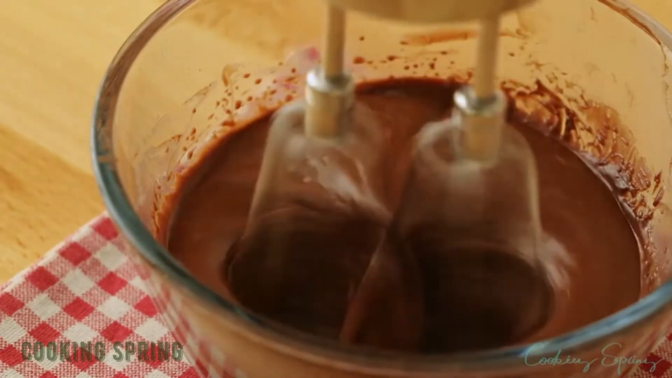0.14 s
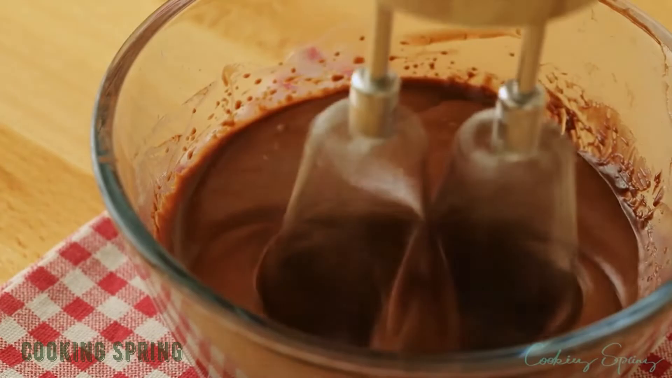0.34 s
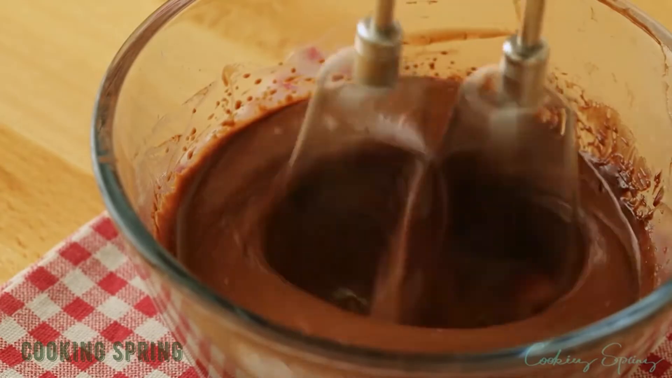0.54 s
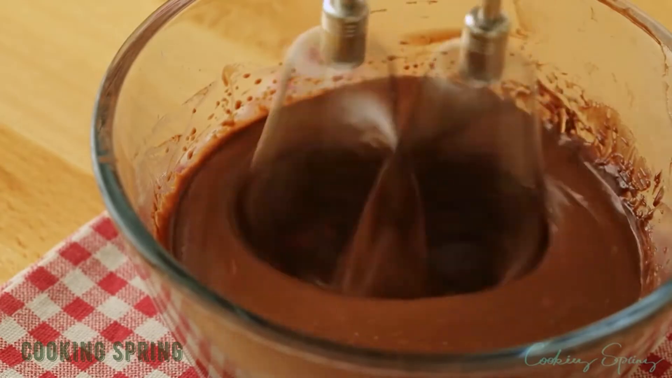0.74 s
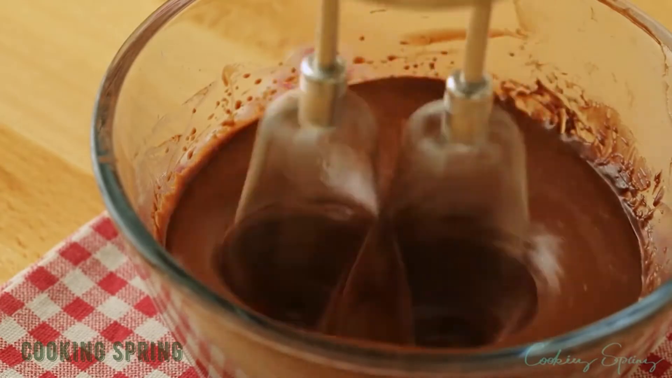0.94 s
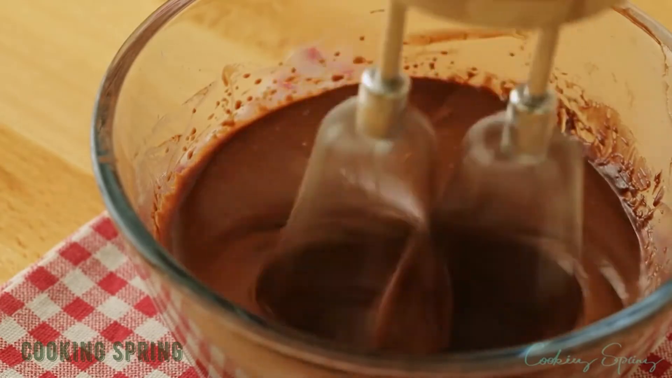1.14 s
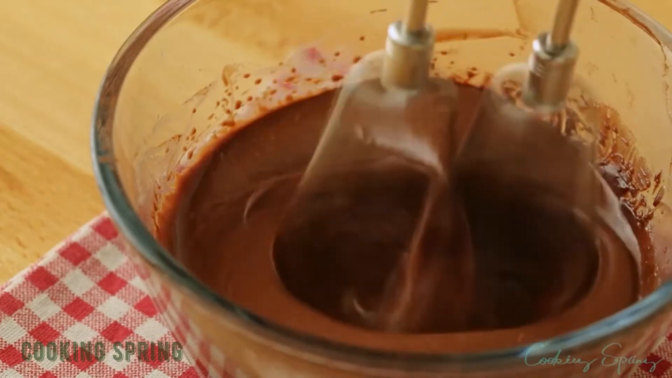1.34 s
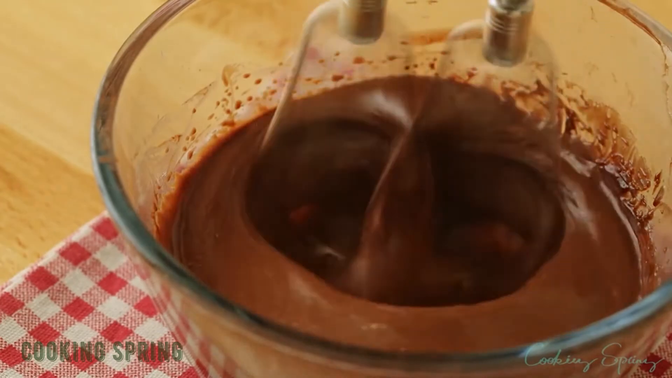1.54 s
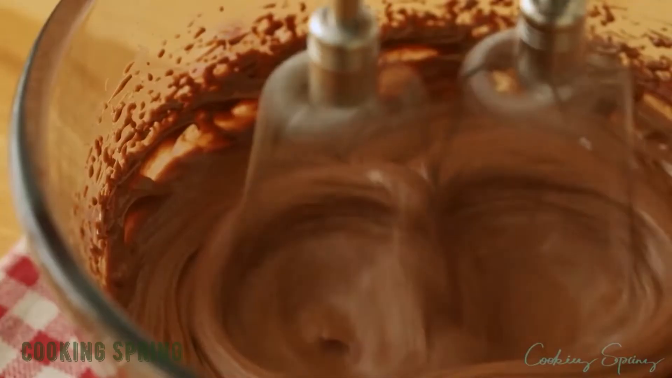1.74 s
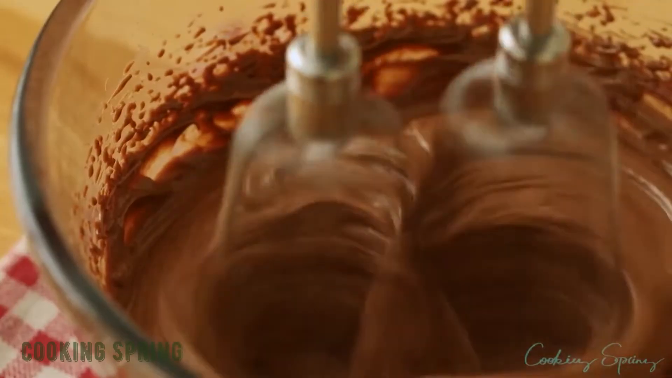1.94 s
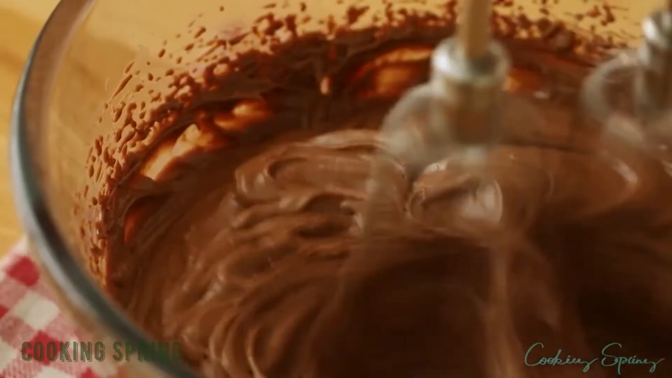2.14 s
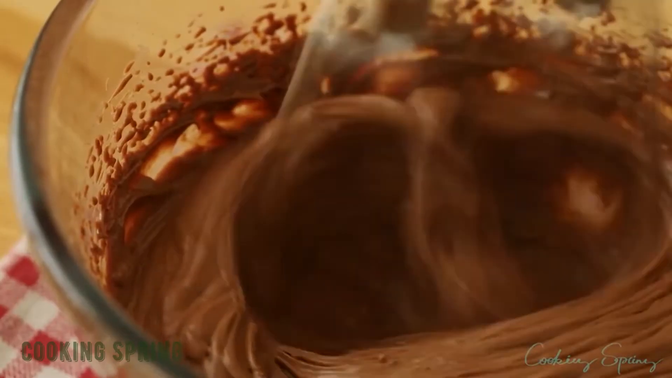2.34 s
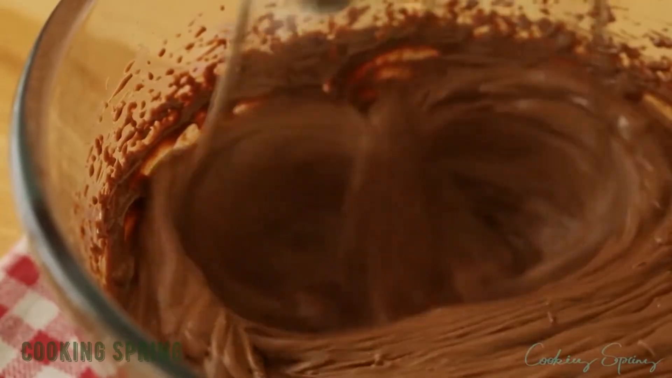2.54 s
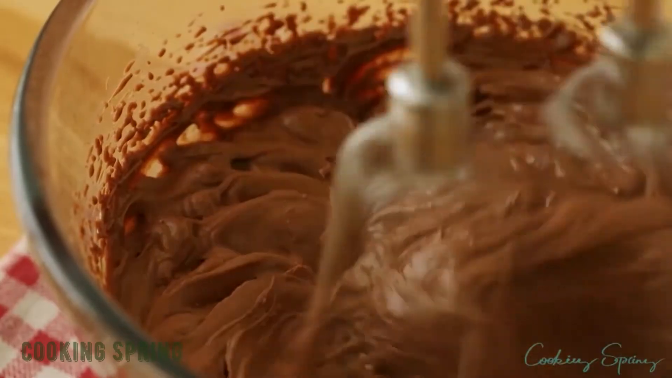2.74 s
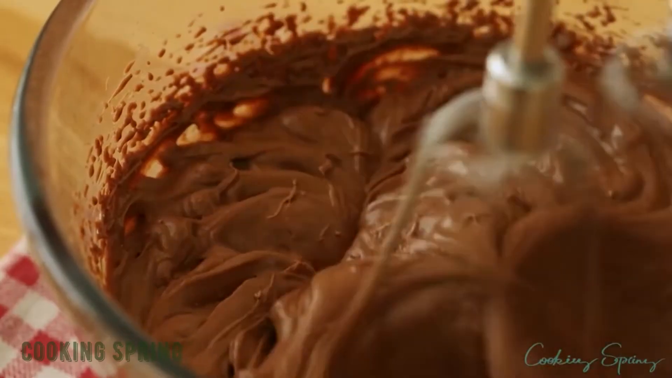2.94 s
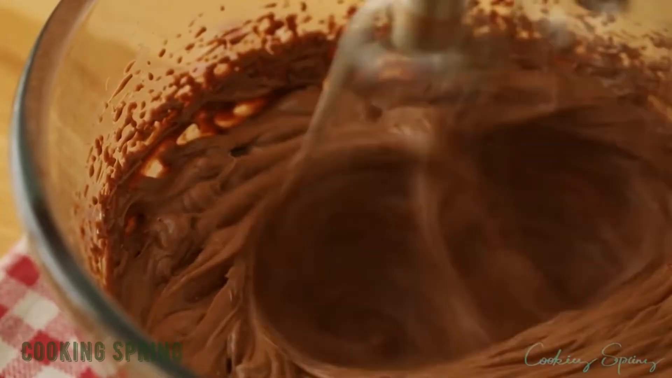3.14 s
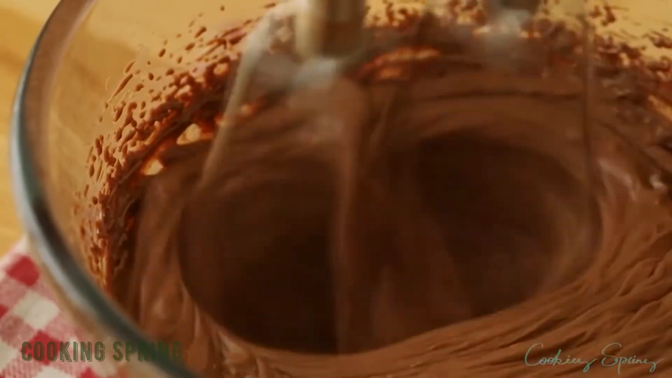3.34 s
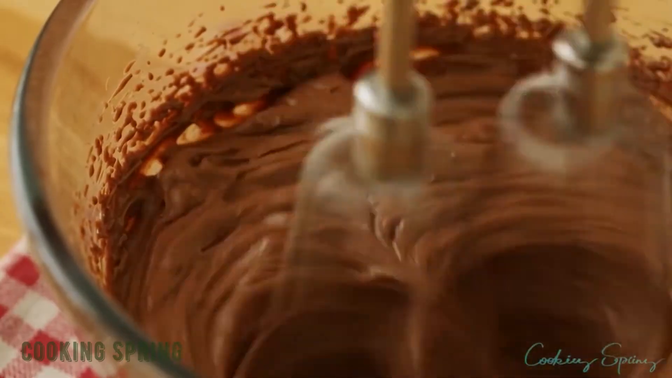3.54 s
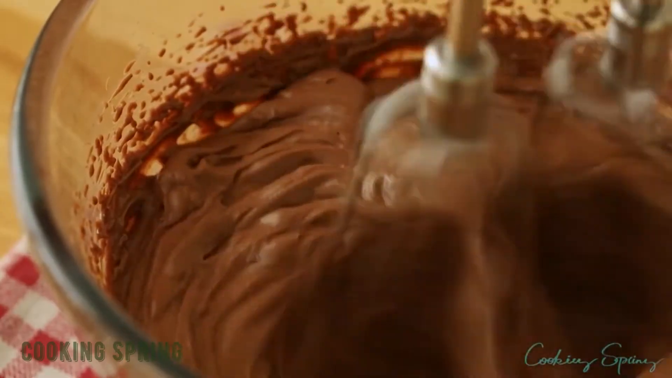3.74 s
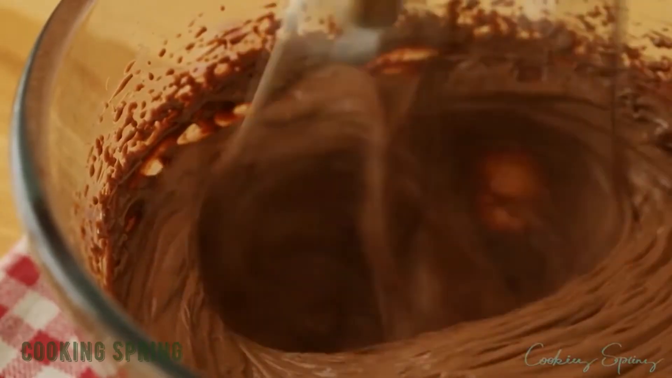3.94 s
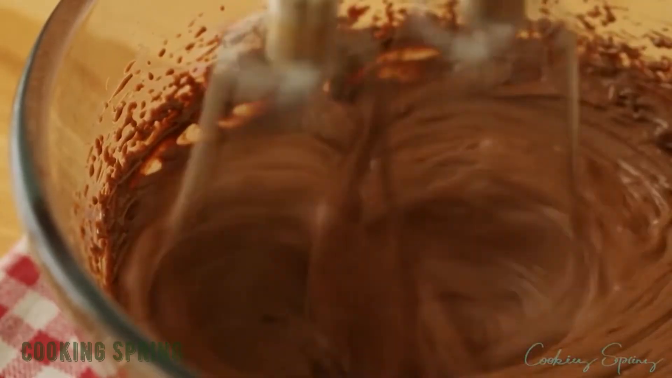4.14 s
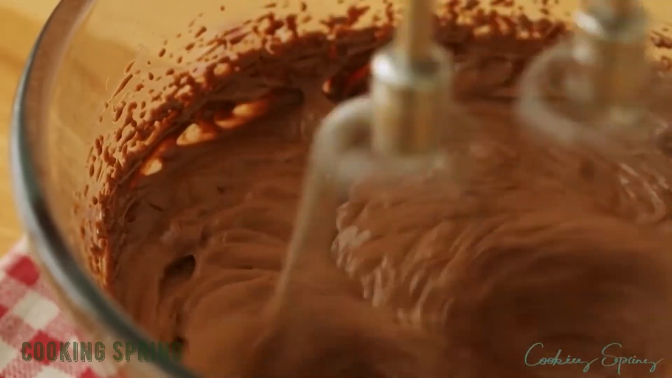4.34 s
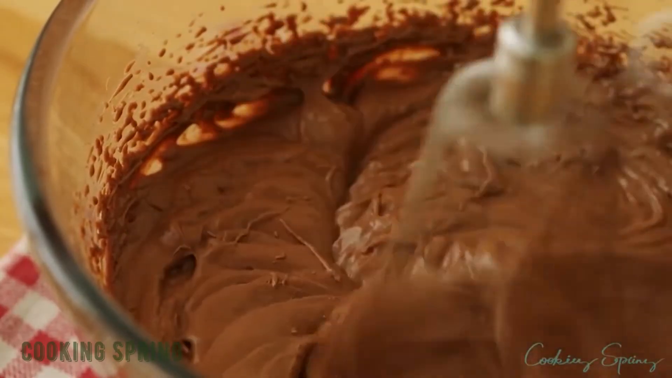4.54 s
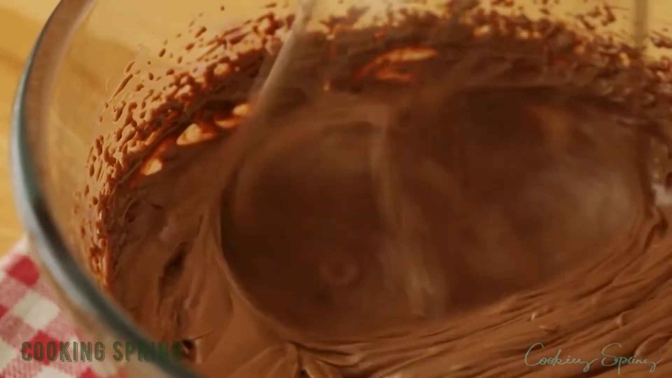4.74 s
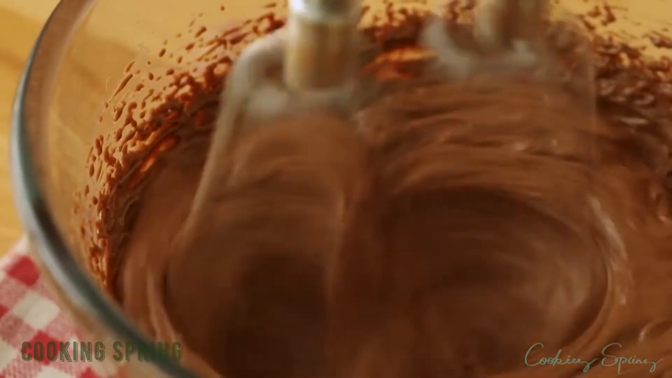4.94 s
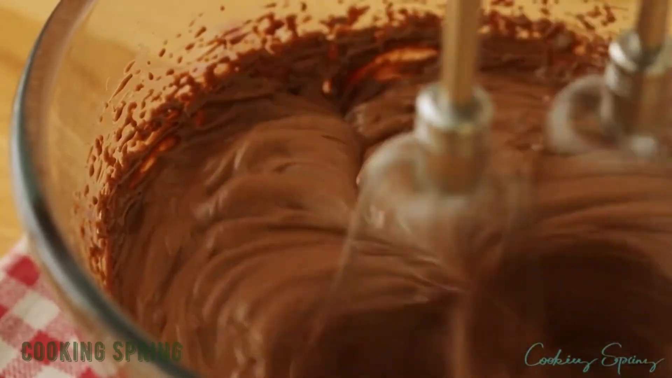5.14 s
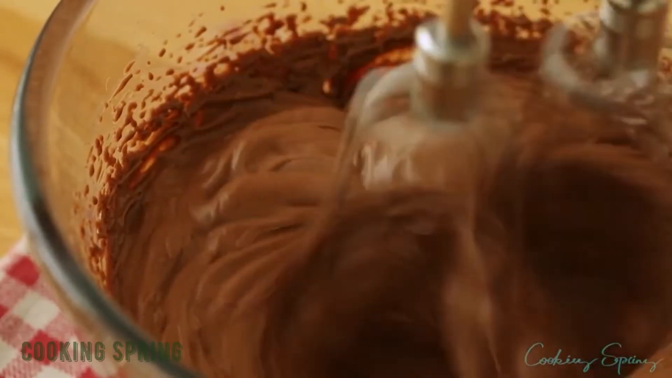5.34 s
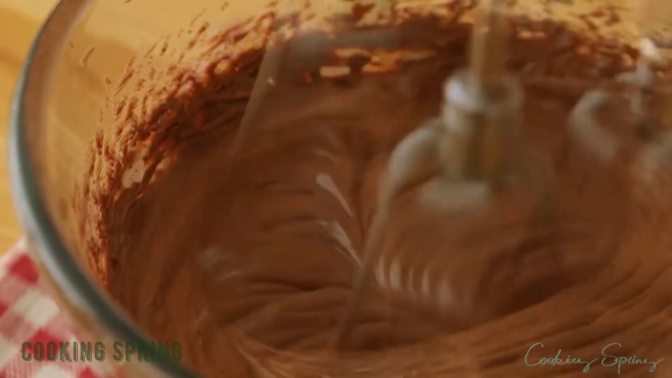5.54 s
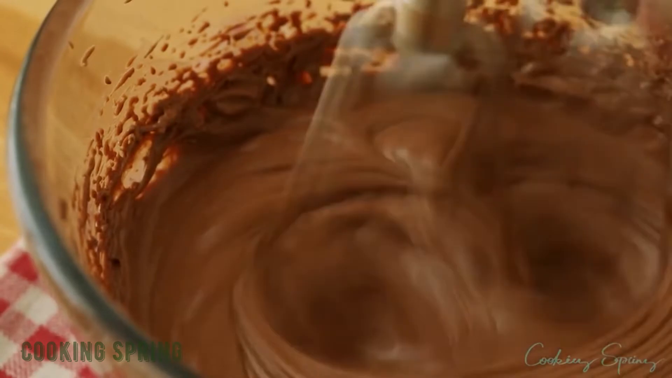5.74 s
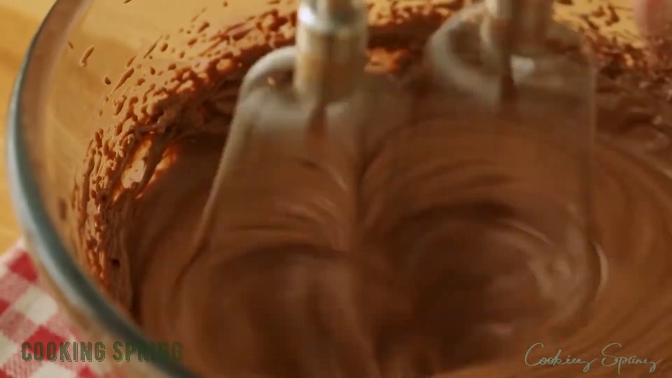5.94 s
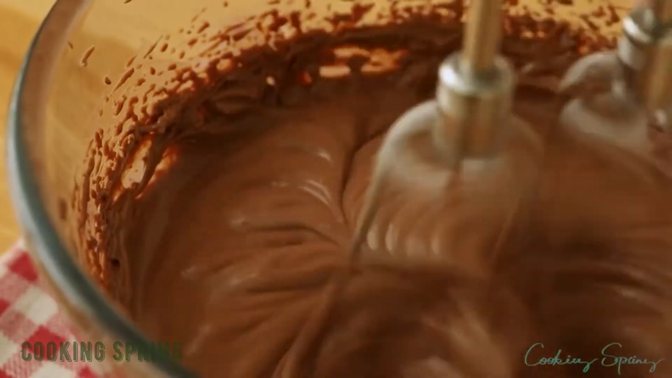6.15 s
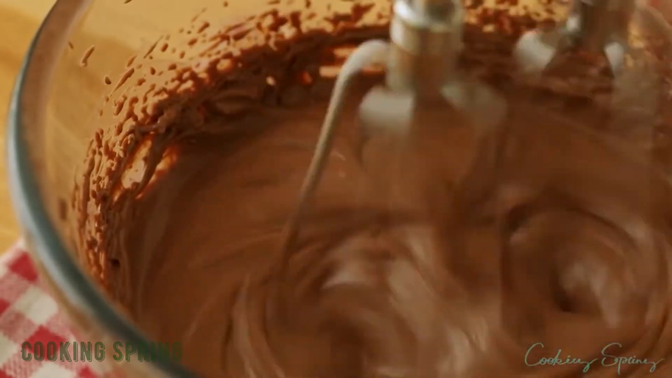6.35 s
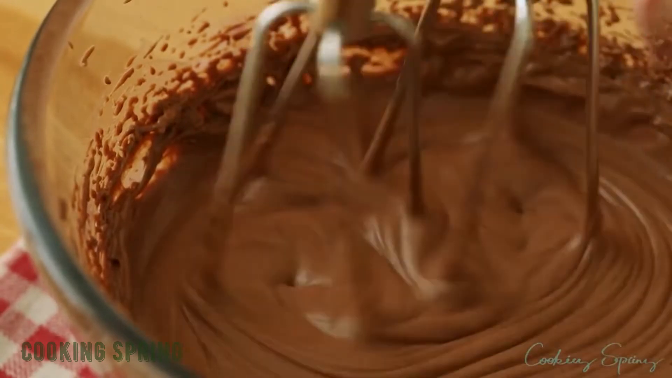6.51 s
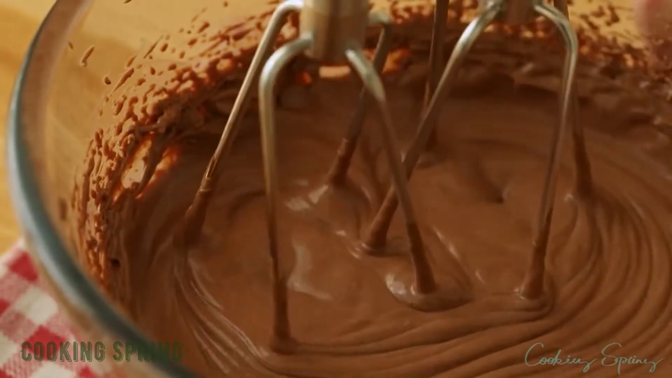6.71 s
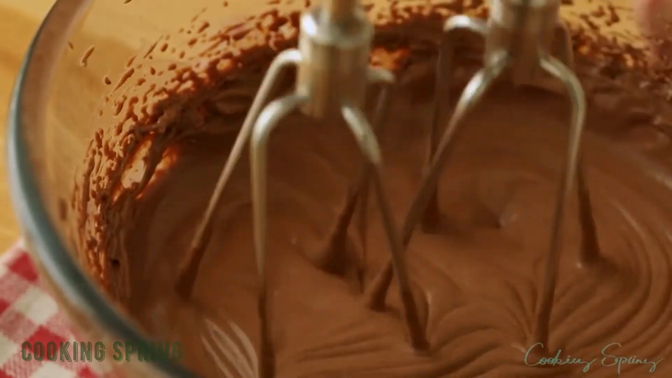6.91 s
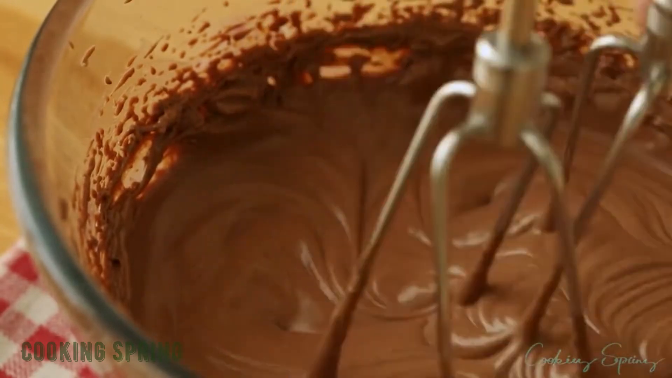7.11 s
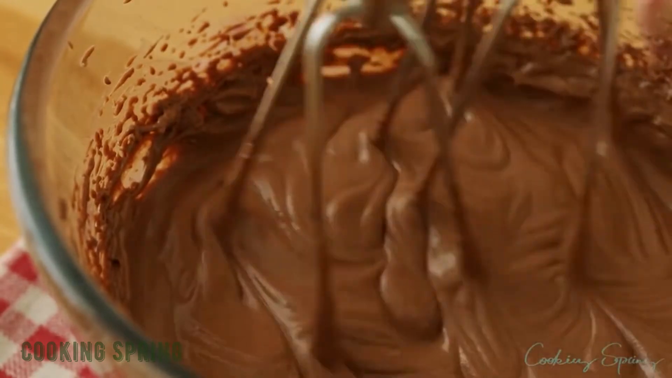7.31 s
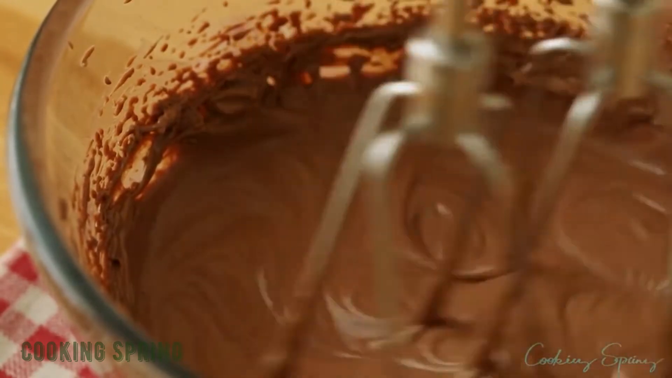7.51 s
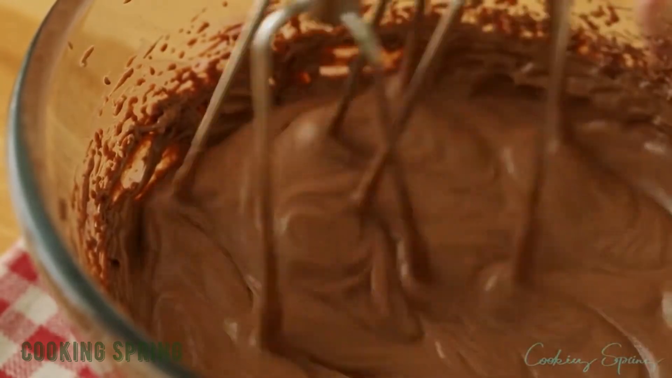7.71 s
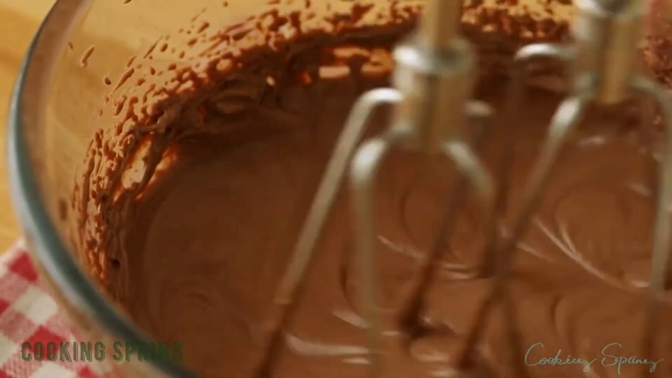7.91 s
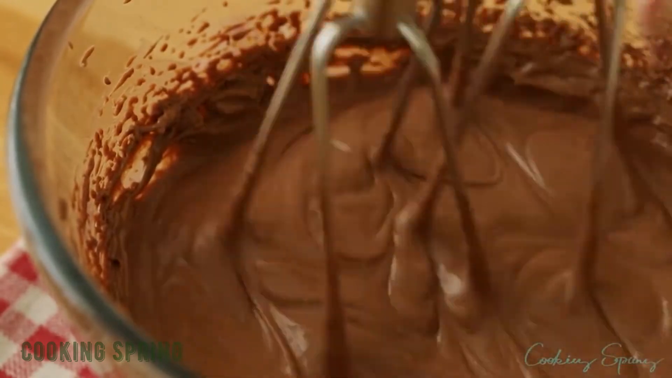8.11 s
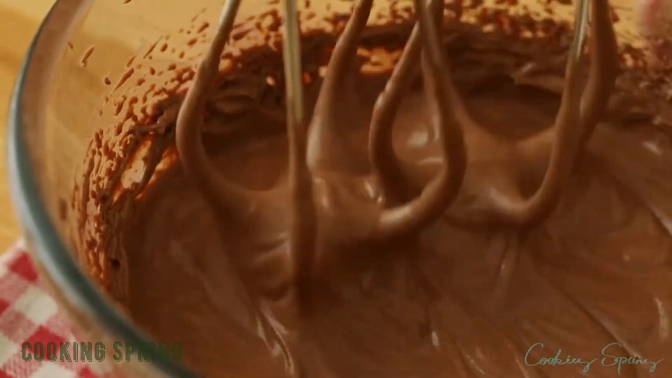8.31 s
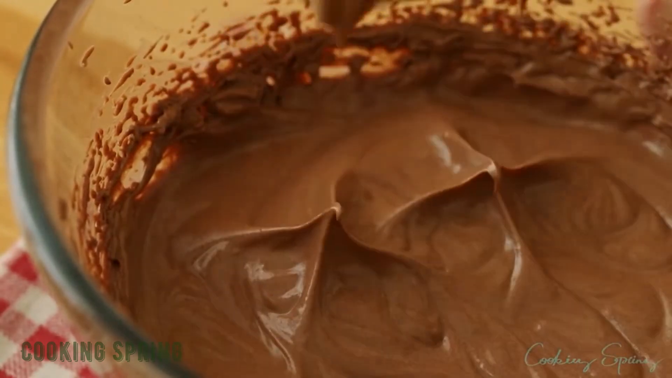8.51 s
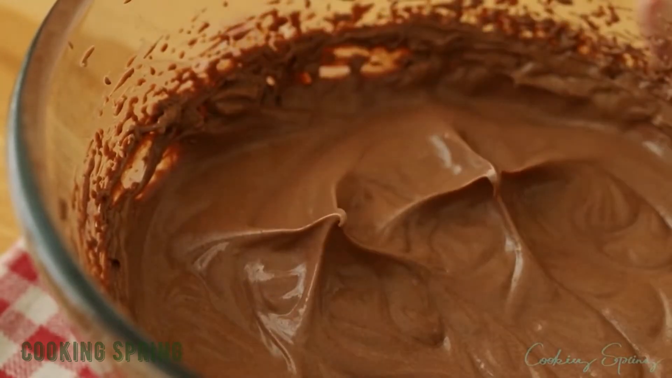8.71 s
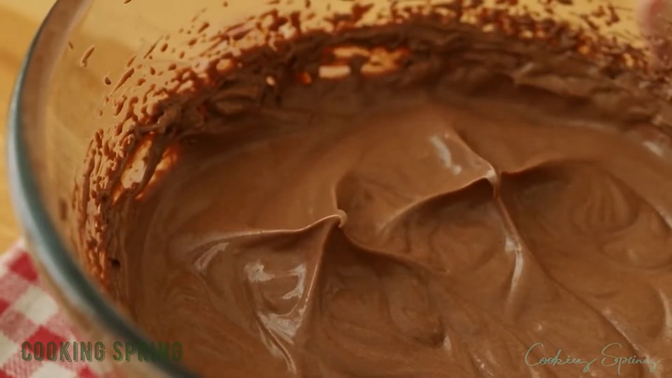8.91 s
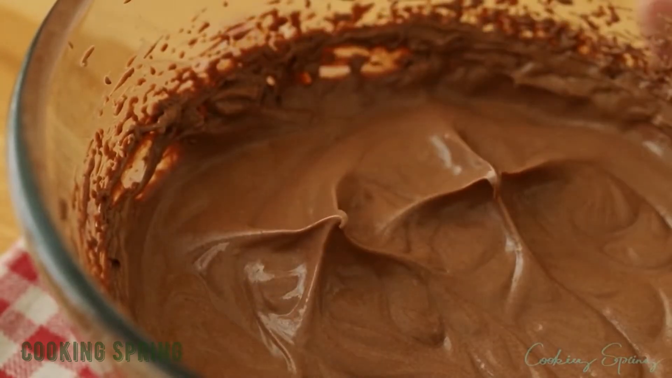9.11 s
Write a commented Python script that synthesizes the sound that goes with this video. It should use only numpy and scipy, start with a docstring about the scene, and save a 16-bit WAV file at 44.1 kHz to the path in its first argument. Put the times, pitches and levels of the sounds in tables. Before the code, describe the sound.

A kitchen hand mixer runs at the left, heard close and fairly dry: a nasal motor whine with gritty fan whir, wet slosh and quick glassy clinks. After a fast restart the batter sounds thicker and less splashy, the wires striking in short ringing runs. Then a slower, lower whirr knocks harder, coasts down to nothing, and isolated hollow clacks ring out before only faint appliance hiss remains.

```python
"""Hand mixer in batter

A hand mixer whips batter in a glass bowl, heard from the left. Its motor is a sum of shaft orders that
restarts once, runs slower and then winds down; fan whir, slosh and splash are shaped noise.
Beater wires ring the glass as damped modes with bursts of contact noise. After a short fade the still
beaters tap the bowl over a kitchen hiss of steady noise and a few fuzzy tones."""
import sys
import numpy as np
from scipy import signal
from scipy.io import wavfile
from scipy.ndimage import uniform_filter1d

SR = 44100
rng = np.random.default_rng(int(sys.argv[2]) if len(sys.argv) > 2 else 0)


def digitize_waveform(pressure):
    """Quantize a signal to 16-bit integers and store it at the path in sys.argv[1].

    Rows of a 2-D input are taken as channels; values are limited to [-1, 1].
    """
    field = np.atleast_2d(pressure).T
    bounded = np.clip(field, -1, 1)
    quanta = np.round(bounded * 32767).astype(np.int16)
    wavfile.write(sys.argv[1], SR, quanta)


def attenuation_scalar(level_db):
    """Turn a level in dB into a linear amplitude multiplier (20 dB per decade)."""
    decades = np.asarray(level_db, float) / 20
    return 10 ** decades


N = 404396  # samples

# speed of the motor shaft: t/s, f/Hz
SHAFT = [(0, 292.3), (1.685, 293), (1.695, 213), (1.76, 229), (1.9, 276), (2.0, 296), (2.3, 293.3),
         (3.1, 291.6), (4.05, 294.3), (4.75, 293.4), (4.95, 291), (5.5, 293), (5.515, 176.5),
         (6.215, 175.5), (6.33, 123), (6.42, 82), (6.5, 48), (6.58, 25)]
# work of the mixer: t/s, whir of fan and gears level/dB, slosh of batter level/dB, splash level/dB
EFFORT = [(0.0, -59, -75, -57.5), (0.308, -52.5, -56, -61), (0.5, -56, -62.5, -56), (.69, -54, -62, -58.5),
          (.8, -58, -69.5, -58), (1.1, -55.5, -62.5, -59), (1.27, -48, -58.5, -57),
          (1.4, -57.5, -65.5, -56), (1.685, -56.5, -68, -61.5), (1.7, -64.5, -70, -91),
          (2.11, -56.5, -68, -79), (2.5, -57, -68.5, -66), (2.67, -65, -59, -57.5), (2.8, -56, -66.5, -78),
          (3.4, -57.5, -67, -74), (4.16, -59, -67.5, -67), (4.7, -57.5, -67, -79), (5.12, -59.5, -72, -84),
          (5.5, -56.5, -64.5, -69), (5.515, -57, -54.5, -83), (6.035, -57, -55, -76),
          (6.133, -54, -51, -69), (6.3, -61.5, -61.5, -75), (6.45, -73, -65, -72), (6.58, -76, -56, -74)]
# thin batter, spin-up, thick batter, slow speed, coasting, still beaters: from t/s, shaft hum level/dB,
# gear whine level/dB, commutator whine level/dB, thud re knock level/dB, tick re glass ring level/dB
STAGES = [(0, -75.5, -65.5, -68, -6.5, -8), (1.69, -78, -69, -72.5, -6, -8),
          (1.88, -75.5, -63.5, -72, -2, -9), (5.51, -74.5, -80, -62, -1.5, -14.5),
          (6.235, -100, -90, -64, -3, -10), (6.6, -120, -120, -120, -25, -14)]
GEARING = 19.4  # motor turns per beater turn
WIRES = 8  # four on each of two beaters
THICK_S, FADED_S = 1.69, 6.586  # end of the thin batter; end of the mixer's fade


def mixer():
    """Rotating machinery: one shaft angle drives the whine, the load throb and the passing wires."""
    t = np.arange(N) / SR
    shaft_hz = curve(SHAFT, 1) * (1 + .0007 * drift(.05))
    turns = np.cumsum(shaft_hz) / SR
    beater = 2 * np.pi * turns / GEARING
    # load peaks twice and four times in a beater turn, and once in five shaft turns
    throb = np.cos(2 * beater) + .6 * np.cos(4 * beater) + .5 * np.cos(2 * np.pi * turns / 5)
    running = motor_whine(shaft_hz, turns, throb) + fan_whir(throb) + batter(turns) + mains_buzz()
    return running * np.interp(t, [6.46, FADED_S], [1, 0])


def motor_whine(shaft_hz, turns, throb):
    """Order spectrum: each partial is a fixed multiple of the shaft speed, modulated by the load."""
    # orders of the hum, the gears and the commutator, one list each: multiple of shaft f, level/dB
    order_groups = [
        [(1, 0), (2, -8), (3, -1), (4, -3), (5, -4)],
        [(6, -4), (7, -8), (8, 0), (10, -12), (13, -13), (14, -12)],
        [(12, 0), (24, -2), (48, -19)],
    ]
    # what the case lets out: f/Hz, level/dB
    case = [(700, -12), (1050, -2), (1500, -6), (2050, 0), (2400, 0), (2750, -5), (3500, 1), (4300, -4),
            (5200, -15), (7300, -9), (9000, -45)]
    whine, t = 0, np.arange(N) / SR
    for column, (orders, throb_db) in enumerate(zip(order_groups, (1.1, 4.4, 1.5)), 1):
        for multiple, db in orders:
            # the case colours gears and commutator, not the hum
            case_db = np.interp(multiple * shaft_hz, *np.transpose(case)) * (column > 1)
            level_db = stage(column, t) + db + case_db + throb_db * throb + 1.1 * drift(.025)
            tone = np.cos(2 * np.pi * (multiple * turns + rng.random()))
            whine = whine + np.sqrt(2) * attenuation_scalar(level_db) * tone
    return whine


def fan_whir(throb):
    """Broadband flow and gear noise, amplitude-modulated by the load and by fast chance."""
    # spectrum of the whir: f/Hz, level/dB per Hz
    whir_spectrum = [(700, -74), (1500, -16), (1750, -8.5), (2150, -3.5), (2340, 4), (2600, -8.5),
                     (3490, -10), (5300, -17), (7000, -15.5), (7700, -18.5), (8600, -26.5), (14000, -29.5)]
    return noise(whir_spectrum, 1.2) * attenuation_scalar(curve(EFFORT, 1) + 1.2 * throb + 1.5 * drift(.004))


def batter(turns):
    """Impulsive liquid noise: passing wires gate a low slosh and a bright, shorter splash."""
    # spectrum of the slosh: f/Hz, level/dB per Hz
    slosh_spectrum = [(60, -70), (120, -29), (200, -3.5), (450, -2.5), (850, 1.5), (1150, 3.5), (1500, -10),
                      (2500, -24)]
    # spectrum of the extra gurgle of thin batter: f/Hz, level/dB per Hz
    glug_spectrum = [(100, -70), (190, -0.5), (330, 5.5), (600, -26)]
    # spectrum of the splash: f/Hz, level/dB per Hz
    splash_spectrum = [(2500, -20), (3500, 0), (4300, 1.5), (5300, -6.5), (7500, -5.5), (9000, -20.5),
                       (13300, -17), (15000, -28)]
    thin = np.arange(N) / SR < THICK_S
    passes = WIRES * turns / GEARING
    slosh = noise(slosh_spectrum, 1.7) + attenuation_scalar(-7.5) * thin * noise(glug_spectrum, 2.3)
    slosh *= attenuation_scalar(curve(EFFORT, 2)) * slaps(passes / 2, 4, .012)
    splash = noise(splash_spectrum, 1.5) * attenuation_scalar(curve(EFFORT, 3)) * slaps(passes, 5, .0025)
    return slosh + splash


def slaps(passes, spread_db, seconds):
    """Shot noise: each pass of a wire starts a puff of random size that decays exponentially."""
    puffs = np.diff(np.floor(passes + .3 * drift(.01)), prepend=0) > 0
    puffs = puffs * attenuation_scalar(spread_db * rng.standard_normal(N))
    return evened(signal.lfilter([1], [1, -np.exp(-1 / (seconds * SR))], puffs) + 0.76)


def mains_buzz():
    """Magnetic hum of the windings: mains harmonics that stop when the power goes off."""
    # harmonics: f/Hz, level/dB
    harmonics = [(240, -104), (360, -81.5), (720, -79.5)]
    t = np.arange(N) / SR
    powered = np.interp(t, [6.2, 6.26], [1, 0])
    buzz = sum(attenuation_scalar(db + 2.4 * drift(.04)) * np.sin(2 * np.pi * f * t) for f, db in harmonics)
    return np.sqrt(2) * powered * buzz


def stage(column, s):
    """Piecewise-constant regime: the value that the stage running at time s gives."""
    rows = np.array(STAGES)
    return rows[np.searchsorted(rows[:, 0], s, "right") - 1, column]


def knocks():
    """Modal impact: each blow rings the same modes in its own mix, with a burst of contact noise."""
    # bowl and beaters, one list for thud, knock, clack, ring and tick: f/Hz, level/dB, t60/s
    bowl_modes = [
        [(529, -3, 0.014), (764, -6.5, 0.07), (885.4, -4.5, 0.045), (1008, -2.5, 0.04)],
        [(1222.6, 4.5, 0.028), (1430, -3.5, 0.042), (1908, 11.5, 0.019), (2172, 5.5, 0.023), (2410, 0.5, 0.027)],
        [(2936, -8, 0.051), (3698, 4.5, 0.043), (4213, 13.5, 0.011), (4710, 6.5, 0.018)],
        [(5800, -13, 0.011), (6720, -4.5, 0.049), (6717, 4.5, 0.025), (7150, -2, 0.027)],
        [(8900, 1, .02), (10600, -3, .025), (10170, 0, 0.027), (12700, -16, 0.013)],
    ]
    # contact noise of the same five parts: low f/Hz, high f/Hz, level/dB re the ringing
    contact_bands = [(516, 1240, -3.5), (1065, 3020, -6.5), (2830, 5440, 0.5), (5860, 7900, -4),
                     (7040, 13200, 2.5)]
    s, levels = strikes()
    t = np.arange(4000) / SR
    onset = slice(260)  # samples over which a part's level is set
    blows = np.zeros((len(s), len(t)))
    for modes, (low_hz, high_hz, crack_db), level_db in zip(bowl_modes, contact_bands, levels):
        hz, db, t60 = np.transpose(modes)[:, None, :, None]
        mix, shift, phase = np.moveaxis(rng.standard_normal((len(s), len(modes), 1, 3)), 3, 0)
        detune = 1 + 0.012 * shift * (hz < 5000)  # batter loads the low modes differently each time
        decay = attenuation_scalar(db + 4.25 * mix - 60 * t / t60)
        ring = (decay * np.sin(2 * np.pi * hz * detune * t + phase)).sum(1)
        burst = rng.standard_normal(blows.shape) * (attenuation_scalar(-60 * t / .012) + .17 * attenuation_scalar(-60 * t / .06))
        burst = filtered(burst, 3, [low_hz, high_hz], "band")
        part = ring / ring[:, onset].std() + attenuation_scalar(crack_db) * burst / burst[:, onset].std()
        part *= np.minimum(t / (0.00073 + 0.98 / low_hz), 1)  # bass swells more slowly
        part = filtered(part, 2, .68 * low_hz, "high")
        blows += attenuation_scalar(level_db)[:, None] * part / part[:, onset].std(1, keepdims=True)
    blows = filtered(blows, 2, 330, "high")  # the blows carry little below 330 Hz
    # blows of the running mixer also jolt the table, in step with their ticks
    jolt = attenuation_scalar(levels[4] - 15) * (s > 1.7) * (s < FADED_S)
    thump = np.sin(2 * np.pi * 62 * t) * attenuation_scalar(-60 * t / 0.054) * np.minimum(t / 0.00084, 1)
    blows += jolt[:, None] * thump
    out = np.zeros(N + len(t))
    np.add.at(out, np.round(s * SR).astype(int)[:, None] + np.arange(len(t)), blows)
    return out[:N]


def strikes():
    """Contact timing: rows of wires at the beaters' pace plus light grazes; gives times and five levels."""
    # beaters touch the bowl: t/s, wires that strike in a row, knock level/dB, clack level/dB, ring level/dB
    contacts = [(.002, 1, -46, -44, -43.5), (0.0667, 1, -54, -49.5, -53.5), (0.0987, 1, -49.5, -43, -57),
                (.27, 1, -48.5, -50.5, -57), (.334, 2, -53, -43.5, -51), (0.3952, 1, -52, -53, -53),
                (.465, 1, -61, -53, -58), (.5316, 1, -53, -53, -60), (.566, 1, -50.5, -44.5, -64),
                (.5994, 1, -49, -47, -55), (.6178, 1, -50, -49.5, -66), (0.6703, 1, -48.5, -44.5, -47.5),
                (.705, 1, -48, -45.5, -52.5), (.836, 1, -51, -48.5, -60), (0.8678, 1, -48.5, -45, -57),
                (0.8999, 1, -44.5, -44.5, -52), (0.9334, 1, -48.5, -49.5, -56), (1.101, 1, -50.5, -49, -54),
                (1.1352, 1, -50, -48, -54), (1.1698, 1, -51.5, -48.5, -58), (1.2026, 1, -50, -46, -54),
                (1.2268, 1, -49, -45.5, -53), (1.2616, 1, -49, -43.5, -52.5), (1.2954, 1, -48.5, -44, -52),
                (1.3294, 1, -49, -42.5, -53), (1.3628, 1, -50, -40.5, -52), (1.3974, 1, -50, -43, -50),
                (1.4316, 1, -52, -47, -55), (1.4656, 1, -55, -47, -54), (1.517, 1, -58, -49.5, -54),
                (1.5705, 1, -47, -44.5, -45.5), (1.6367, 1, -47.5, -45, -50.5), (1.935, 1, -60, -58, -60),
                (1.9667, 1, -48, -53.5, -56), (2.0316, 1, -55.5, -53.5, -54.5),
                (2.1247, 3, -54.5, -45, -48.5), (2.1927, 2, -57, -47.5, -51.5), (2.2954, 1, -54, -46, -51),
                (2.3658, 1, -56, -51.5, -51.5), (2.3998, 1, -54.5, -59, -53.5), (2.428, 2, -47, -45, -43.5),
                (2.4967, 2, -50.5, -49, -44.5), (2.567, 1, -59, -57, -53), (2.5917, 2, -46.5, -50, -44.5),
                (2.6302, 1, -44, -54, -47), (2.663, 1, -48.5, -52, -46.5), (2.688, 2, -52, -64, -45.5),
                (2.7118, 3, -53, -54, -46.5), (2.771, 1, -68, -72, -51), (2.7843, 2, -52, -45.5, -38.5),
                (2.838, 1, -74, -62, -52), (2.8535, 2, -48, -44.5, -39), (2.8987, 1, -65, -60, -53),
                (2.9044, 4, -57, -45.5, -40), (2.9896, 2, -51.5, -44.5, -45), (3.057, 2, -58, -45.5, -48),
                (3.101, 1, -66, -51, -58), (3.127, 1, -51, -48, -54), (3.162, 1, -57.5, -49.5, -53),
                (3.196, 1, -56.5, -52.5, -54), (3.2934, 2, -57, -52, -54), (3.433, 1, -53.5, -55.5, -61),
                (3.4964, 1, -56, -51, -59), (3.529, 1, -53.5, -53.5, -60), (3.561, 1, -54.5, -51.5, -60),
                (3.595, 2, -54, -49.5, -56), (3.6232, 2, -52, -43, -60), (3.792, 1, -51.5, -45, -54.5),
                (3.862, 1, -55.5, -53, -57), (3.9631, 1, -56, -56, -55), (4.0014, 1, -52.5, -51, -53.5),
                (4.1968, 1, -52.5, -50.5, -53), (4.384, 2, -59, -67, -50), (4.4278, 5, -58.5, -53.5, -40),
                (4.495, 4, -57, -52, -39.5), (4.589, 1, -62, -56, -53.5), (4.6582, 1, -50.5, -50, -42.5),
                (4.694, 2, -63, -67, -52), (4.719, 2, -57, -55, -43), (4.7956, 1, -52, -54, -51.5),
                (4.834, 1, -50.5, -52.5, -47.5), (5.223, 1, -65, -55.5, -74), (5.2737, 1, -73, -57, -75),
                (5.306, 1, -74, -60, -67), (5.392, 1, -53.5, -50.5, -55), (5.4274, 1, -59, -56, -63),
                (5.523, 5, -45, -45.5, -42), (5.623, 2, -44, -45.5, -43), (5.6797, 1, -38.5, -40.5, -40),
                (5.7381, 1, -35.5, -45, -38.5), (5.798, 1, -36, -47, -48), (5.864, 1, -39.5, -48, -50),
                (5.9049, 2, -42.5, -43, -42), (5.9688, 1, -43, -47, -55), (6.0218, 1, -49, -48, -56),
                (6.0605, 2, -46.5, -47.5, -48.5), (6.104, 2, -42, -44.5, -49.5), (6.1787, 1, -49, -54, -64),
                (6.231, 1, -45, -46, -43.5), (6.3018, 1, -50.5, -57, -68), (6.394, 1, -54, -70, -69),
                (6.431, 1, -57.5, -76, -72), (6.52, 1, -57.5, -77, -72), (6.5723, 1, -62, -76, -72),
                (6.9677, 1, -41, -57, -59), (7.1261, 1, -22, -33.5, -42), (7.3285, 1, -56.5, -46, -42.5),
                (7.3808, 1, -36.5, -49, -46), (7.4414, 1, -65, -64, -63), (7.569, 1, -49.5, -59, -54),
                (7.5847, 1, -22, -33, -27.5), (7.7048, 1, -30, -44.5, -40.5),
                (7.7417, 1, -30, -43.5, -41.5), (8.0125, 1, -30, -50, -47)]
    # a light touch amid the strongest splashing: knock, clack and ring level/dB
    graze_levels = [-55.5, -53, -59]
    graze_share = 0.34  # chance of a graze each half beater turn
    graze_per_splash = 0.85  # grazes grow with the splashing (dB per dB)
    dig_db, dig_thud_db = 1.5, -0.5  # each next wire knocks harder, with less thud for its knock
    clip_db = -3  # the first wire of a row only clips the glass
    uneven_db = 1.5  # spread within a row; twice this for grazes
    coasting_s = STAGES[4][0]
    rows = []
    for s, wires, knock_db, clack_db, ring_db in contacts:
        gap = GEARING / WIRES / np.interp(s, *np.transpose(SHAFT))
        in_row = wires > 1.5
        for k in range(round(wires)):
            first_db = clip_db * in_row * (k == 0)
            rows.append((s + k * gap, dig_thud_db * k, knock_db + dig_db * k,
                         clack_db + first_db, ring_db + first_db, in_row))
    half_turns = np.cumsum(curve(SHAFT, 1)) / SR / GEARING * 2
    at = np.flatnonzero(np.diff(np.floor(half_turns)))
    at = at[(rng.random(len(at)) < graze_share) & (at < coasting_s * SR)]
    splash_db = curve(EFFORT, 3)
    for k in at:
        graze_db = graze_levels + graze_per_splash * (splash_db[k] - splash_db.max())
        rows.append((k / SR, 0, *graze_db, 2))
    s, low_db, knock_db, clack_db, ring_db, uneven = np.transpose(rows)
    thud_db = knock_db + low_db + stage(4, s)
    tick_db = ring_db + stage(5, s)
    levels = np.array([thud_db, knock_db, clack_db, ring_db, tick_db])
    return s, levels + uneven_db * uneven * rng.standard_normal((len(s), 5)).T


def room(x):
    """Diffuse reverberation: convolution with a short decaying noise tail of tiles and worktop."""
    t = np.arange(9000) / SR
    tail = rng.standard_normal(len(t)) * attenuation_scalar(-60 * t / 0.15) * (t > .004)
    tail = signal.lfilter([1], [1, -.4], tail)
    return signal.oaconvolve(x, tail / np.linalg.norm(tail))[:N]


def kitchen():
    """Stationary noise and narrow-band tones of an appliance, louder at first and soon settled."""
    # spectrum of the hiss: f/Hz, level/dB per Hz
    kitchen_spectrum = [(60, -53), (160, -29), (350, -23), (700, -27.5), (1050, -19.5), (1230, -5.5),
                        (1750, -0.5), (2300, -5.5), (2900, -5.5), (4500, -16), (6800, -19.5), (9000, -26),
                        (13600, -28), (15000, -70)]
    # fuzzy tones: f/Hz, width/Hz, level/dB
    fuzzy_tones = [(373, 8.7, -87.5), (447, 32, -88), (880, 14, -87), (1263, 17, -76), (2300, 38, -75)]
    t = np.arange(N) / SR
    out = attenuation_scalar(-62.5 + .8 * drift(.05)) * noise(kitchen_spectrum, 1.2)
    for hz, width, db in fuzzy_tones:
        out += attenuation_scalar(db) * drift(1 / (2 * width)) * np.sqrt(2) * np.sin(2 * np.pi * hz * t)
    return out * (1 + 1.5 * np.exp(-abs(t - FADED_S) / 0.042)) * (t > FADED_S)


def channel_hiss():
    """Uncorrelated noise: a faint hiss, separate in each channel, that dips at the fade."""
    # spectrum of the hiss: f/Hz, level/dB per Hz
    hiss_spectrum = [(40, -4), (150, -20), (6000, -14), (15000, 0)]
    dip = np.interp(np.arange(N) / SR, [6.4, 6.56, FADED_S, 6.6], [0.92, 0.21, 0.23, 1])
    return np.array([noise(hiss_spectrum, 1.0), noise(hiss_spectrum, 1.6)]) * attenuation_scalar(-78) * dip


def noise(points, patchy_db):
    """Spectral shaping: random short-time spectra of a given shape, with louder and softer patches."""
    hz = np.fft.rfftfreq(1024, 1 / SR)
    real, imag, patches = rng.standard_normal((N // 256 + 5, 513, 3)).T
    patches = evened(uniform_filter1d(uniform_filter1d(patches, 10, axis=0), 10, axis=1))
    f, db = np.transpose(points)
    shape_db = np.interp(np.log(hz + 1), np.log(f + 1), db)[:, None] + patchy_db * patches
    spectra = (real + 1j * imag) * attenuation_scalar(shape_db)
    return evened(signal.istft(spectra, nperseg=1024, noverlap=768)[1][:N])


def drift(seconds):
    """Low-passed chance: white noise averaged twice over a span, of rms 1."""
    size = max(round(seconds * SR), 2)
    return evened(uniform_filter1d(uniform_filter1d(rng.standard_normal(N), size), size))


def evened(x):
    """Power normalization: scales to rms 1."""
    return x / np.sqrt(np.mean(x ** 2) + 1e-20)


def curve(rows, column):
    """Linear interpolation of one column of a table, at every sample."""
    rows = np.array(rows)
    return np.interp(np.arange(N) / SR, rows[:, 0], rows[:, column])


def filtered(x, order, hz, kind):
    """Butterworth filtering: a maximally flat passband."""
    return signal.sosfilt(signal.butter(order, hz, kind, fs=SR, output="sos"), x)


def scene():
    """Intensity panning: a level difference between the channels sets everything well to the left."""
    taps = knocks()
    near = mixer() + taps + attenuation_scalar(-16.5) * room(taps) + kitchen()
    side = attenuation_scalar([[0], [-9.3]])  # left, right
    return near * 2 * side / side.sum()


def low_pass(x):
    """Removes everything above the highest recorded frequency."""
    return signal.sosfilt(signal.butter(12, 15120, fs=SR, output="sos"), x)


def record(dry):
    """Band limiting: the hiss joins the scene and a steep low-pass ends the treble at 13.9 kHz."""
    mix = filtered(dry + channel_hiss(), 14, 13900, "low")
    return low_pass(mix)


dry = scene()
out = record(dry)
digitize_waveform(out)
```